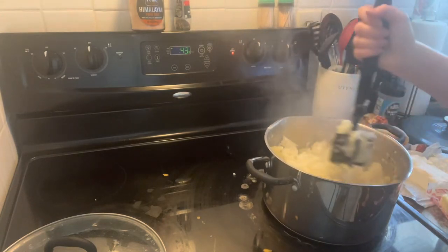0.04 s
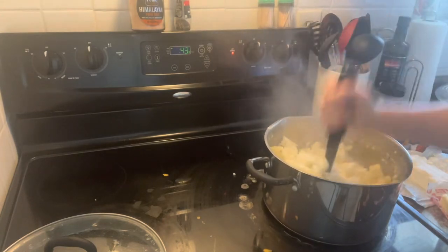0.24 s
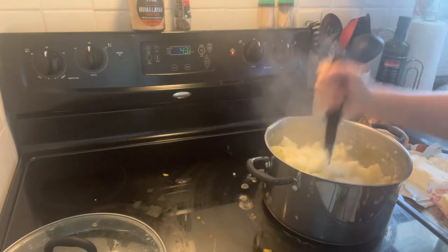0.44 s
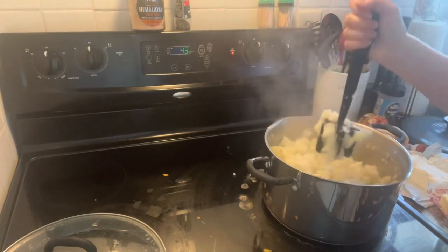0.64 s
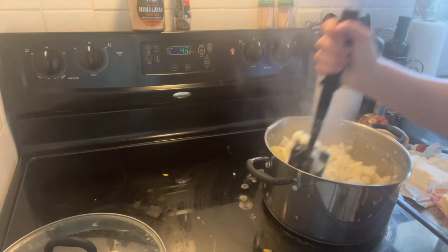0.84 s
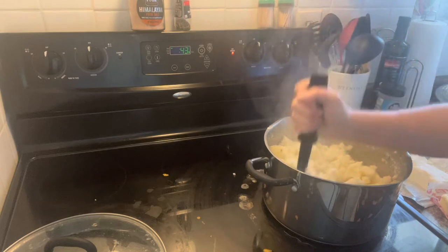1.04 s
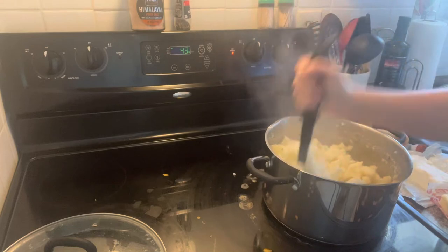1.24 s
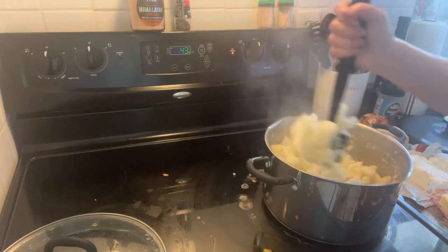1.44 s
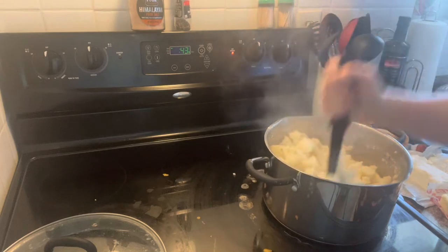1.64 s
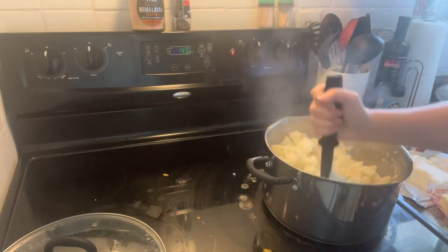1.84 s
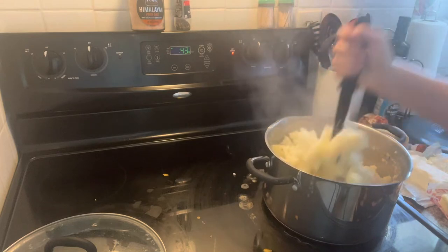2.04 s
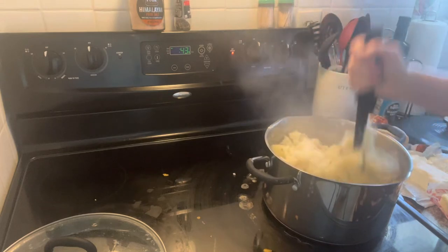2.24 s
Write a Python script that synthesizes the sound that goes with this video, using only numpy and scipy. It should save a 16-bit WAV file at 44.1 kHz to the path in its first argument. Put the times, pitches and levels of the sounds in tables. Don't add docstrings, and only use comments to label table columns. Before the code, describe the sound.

Potato masher thuds against a steel pot, first blow hardest, with wet squishes and soft thumps

```python
import sys
import numpy as np
from scipy import signal
from scipy.fft import rfft, irfft
from scipy.io import wavfile
from scipy.ndimage import uniform_filter1d

SR = 44100
rng = np.random.default_rng(int(sys.argv[2]) if len(sys.argv) > 2 else 0)


def wrap_up_sound(samples):
    columns = np.atleast_2d(samples).T
    tamed = np.clip(columns, -1, 1)
    steps = np.round(tamed * 32767).astype(np.int16)
    wavfile.write(sys.argv[1], SR, steps)


def natural_amplitude(level_db):
    exponent = np.asarray(level_db, float) / 20
    return 10 ** exponent


N = 101429


def evened(x):
    return x / np.sqrt(np.mean(x ** 2) + 1e-20)


def read(points, hz):
    f, value = np.transpose(points)
    return np.interp(np.log(hz + 1), np.log(f + 1), value)


def add(mix, s, sound):
    part = mix[round(s * SR):][:len(sound)]
    part += sound[:len(part)]


def coloured(x, points):
    gain = natural_amplitude(read(points, np.fft.rfftfreq(len(x), 1 / SR)))
    return evened(irfft(rfft(x) * gain, len(x)))


def band(x, hz, width_hz):
    turn = np.exp(2j * np.pi * hz * np.arange(len(x)) / SR)
    r = np.exp(-np.pi * width_hz / SR)
    return evened((turn * signal.lfilter([1], [1, -2 * r, r * r], x / turn)).real)


def ring(hz, db, t60, t):
    return natural_amplitude(db - 60 * t / t60) * np.sin(2 * np.pi * hz * t)


# f/Hz, density/dB per Hz
AIR = [(25, -8.5), (60, 3.5), (120, -11.5), (300, 0.5), (600, -1.5), (1200, -12.5), (2000, -17.5),
       (3500, -22), (16000, -34)]


def room_air():
    hz, _, z = signal.stft(rng.standard_normal(N), SR, nperseg=1024, noverlap=768)
    patches_db = uniform_filter1d(rng.standard_normal(z.shape), size=10, axis=0)
    patches_db = evened(uniform_filter1d(patches_db, size=12, axis=1))
    z = z * natural_amplitude(read(AIR, hz)[:, None] + patches_db)
    return natural_amplitude(-59) * evened(signal.istft(z, SR, nperseg=1024, noverlap=768)[1][:N])


# f/Hz, level/dB rms, blurred share/0-1, blur width/Hz
FAN = [(57.5, -72, 1, 15), (119.6, -73, 0.4, 30), (181, -71, 0, 4.9), (280, -69.5, 0.55, 60),
       (353.2, -73, 0.9, 44), (412.8, -64.5, 0, 30), (513.5, -75, 0.22, 25), (847, -80, 0.4, 14),
       (1815, -74.5, 0, 25), (1858, -76.5, 0.97, 370), (3346, -81, 0.18, 106), (4280, -86.5, 0.6, 30),
       (4830, -87, 0.1, 17), (7370, -81.5, 0.83, 53)]


def fan():
    t = np.arange(N) / SR
    sway_hz, sway_db, sway_phase_rad = 11.5, -46, -.1
    out = natural_amplitude(sway_db) * np.cos(2 * np.pi * sway_hz * t + sway_phase_rad)
    for hz, db, blur, width_hz in FAN:
        steady = np.sqrt(2 - 2 * blur) * np.sin(2 * np.pi * hz * t)
        wavering = np.sqrt(blur) * band(rng.standard_normal(N + SR), hz, width_hz)[SR:]
        out += natural_amplitude(db) * (steady + wavering)
    return out


# t/s, squelch level/dB, fizz level/dB
PRESS = [(0, -72, -76), (.1, -86, -77.5), (.18, -68.5, -68), (.24, -58.5, -78), (.45, -67, -73.5),
         (0.521, -92, -78), (0.632, -68.5, -77), (.87, -82, -78), (.925, -64.5, -69), (1.03, -64.5, -81),
         (1.1, -66.5, -83), (1.25, -66.5, -75), (1.3, -102, -81), (1.6, -85, -72.5), (1.655, -62, -71),
         (1.8, -62, -88), (1.95, -66.5, -74.5), (2.1, -74, -79)]
# f/Hz, density/dB per Hz
MASH = [(300, -15), (1000, 12), (2500, 5), (4000, 3), (6000, -13), (10000, -10), (16000, -36)]
# f/Hz, density/dB per Hz
FIZZ = [(3000, -20), (6000, 5.5), (10000, 2), (13500, 2), (16000, -1)]


def mash():
    grains_per_s, spread_db, grain_db = 1500, 3.5, -2
    size = natural_amplitude(spread_db * np.minimum(rng.exponential(1, N), 5))
    clicks = size * (rng.random(N) < grains_per_s / SR) * rng.choice([-1, 1], N)
    grain = rng.standard_normal(N) + natural_amplitude(grain_db) * evened(clicks)
    t = np.arange(N) / SR
    s, squelch_db, fizz_db = np.transpose(PRESS)
    squelch = coloured(grain, MASH) * natural_amplitude(np.interp(t, s, squelch_db))
    fizz = coloured(grain, FIZZ) * natural_amplitude(np.interp(t, s, fizz_db))
    return squelch + fizz


# start t/s, length/s, level/dB, f/Hz, width/Hz
WHISTLES = [(0.138, 0.061, -75, 3800, 300), (0.283, 0.075, -78, 9940, 200), (.42, 0.07, -76.5, 3860, 400),
            (1.087, 0.048, -77, 9900, 200), (1.17, .02, -75, 3820, 300), (1.21, 0.079, -72, 3800, 400),
            (1.65, .04, -86, 12800, 600), (1.757, .008, -66, 3780, 500), (1.772, 0.0073, -69, 4000, 500),
            (1.876, 0.13, -73.5, 3920, 250)]


def whistles():
    out = np.zeros(N)
    for s, length_s, db, hz, width_hz in WHISTLES:
        n = int(length_s * SR)
        swell = np.sin(np.pi * np.arange(n) / n)
        puff = band(rng.standard_normal(SR // 5), hz, 1.15 * width_hz)[-n:]
        add(out, s, natural_amplitude(db + 4) * swell * puff)
    return out


# t/s, level/dB, f/Hz
TICKS = [(.923, -51, 10500), (1.115, -52, 9500), (1.55, -50.5, 9050), (1.632, -49, 12000),
         (1.728, -64, 12500)]


def ticks():
    out, t = np.zeros(N), np.arange(200) / SR
    for s, db, hz in TICKS:
        add(out, s, ring(hz, db, 0.0014, t))
    return out


# t/s, level/dB, f/Hz, t60/s
THUMPS = [(.225, -49, 422, 0.11), (.31, -28, 527, 0.03), (.328, -35, 477, 0.025), (.44, -41, 211, 0.034),
          (.78, -52, 170, 0.076), (1.045, -44.5, 134.6, 0.19), (1.051, -40, 58.7, 0.17),
          (1.115, -56, 554, 0.052), (1.158, -46.5, 70, .1), (1.75, -32, 280, 0.038),
          (1.049, -57, 2600, 0.042), (1.751, -51.5, 2675, 0.032), (1.128, -51, 169, .05),
          (1.151, -54, 120, 0.087), (1.145, -49.5, 410, 0.091), (1.24, -39, 185, 0.03),
          (1.335, -62, 403, 0.031), (1.679, -47.5, 2050, .03), (1.775, -34.5, 584, 0.031),
          (1.815, -63, 570, .06), (1.84, -39, 179, 0.038), (1.885, -53, 121, 0.087),
          (1.87, -39.5, 323, 0.034), (1.925, -53, 518, 0.13)]


def thumps():
    out, t = np.zeros(N), np.arange(SR // 5) / SR
    for s, db, hz, t60 in THUMPS:
        soft_start = np.minimum(t * hz / 0.5, 1)
        add(out, s, soft_start * (ring(hz, db, t60, t) + ring(1.45 * hz, db - 13, t60, t)))
    return out


# f/Hz, level/dB, t60/s
POT = [(141, -23, 0.14), (294.5, -13, 0.12), (435, -11.5, 0.021), (542.6, 5, 0.045), (675, -9, 0.039),
       (691, -3, 0.046), (820, -6.5, 0.07), (1144, 1, 0.026), (1415, -15.5, 0.11), (1638, 0.5, 0.053),
       (2024, -11, 0.044), (2260, -10.5, 0.044), (2900, -18, 0.049), (4430, -14, 0.12)]
# f/Hz, level/dB, t60/s
HOB = [(62.7, -28.5, 0.93), (66, -28, 0.7)]
# f/Hz, density/dB per Hz
CRACK = [(100, -29.5), (380, -5.5), (750, -1), (980, -9), (1250, 1.5), (2000, -0.5), (3000, -7),
         (4500, -40), (15000, -56)]
# f/Hz, density/dB per Hz
CRACKLE = [(1000, -16), (2700, -2), (4600, -13), (6500, -14), (10000, -38), (14000, -43)]


def knock(contact_ms, level_db, first_touch_db, crackle_db):
    t = np.arange(SR) / SR
    touch_s, bounce_s, bounce_db = 0.002, .0047, -15

    def push(at_s):
        since = np.maximum(t - at_s, 0)
        return since / contact_ms * np.exp(-since * 4000 / contact_ms)

    force = natural_amplitude(first_touch_db) * push(0) + push(touch_s) + natural_amplitude(bounce_db) * push(touch_s + bounce_s)
    body = sum(ring(hz, db, t60, t) * (-1) ** k for k, (hz, db, t60) in enumerate(POT))
    body += sum(ring(hz, db, t60, t) for hz, db, t60 in HOB)
    crack_db, crack_t60 = 0, 0.13
    body += coloured(rng.standard_normal(SR), CRACK) * natural_amplitude(crack_db - 60 * t / crack_t60)
    blow = natural_amplitude(level_db) * signal.fftconvolve(force / push(0).sum(), body)[:SR]

    after_s, crackle_t60, rise_s = t - touch_s, 0.047, 0.00043
    crackle = coloured(rng.standard_normal(SR), CRACKLE) * natural_amplitude(crackle_db - 60 * after_s / crackle_t60)
    return touch_s, blow + crackle * np.clip(after_s / rise_s, 0, 1)


# blow t/s, level/dB, contact/ms, first touch/dB, crackle/dB
KNOCKS = [
    (0.2453, -16.5, 0.51, -31, -33),
    (1.0473, -30.5, 0.83, -11, -63),
    (1.749, -28, 0.78, -41, -56),
]


def knocks():
    close, thrown = np.zeros(N), np.zeros(N)
    thrown_t60 = .035
    fade = natural_amplitude(-60 * np.arange(SR) / SR / thrown_t60)
    for s, level_db, contact_ms, first_touch_db, crackle_db in KNOCKS:
        touch_s, sound = knock(contact_ms, level_db, first_touch_db, crackle_db)
        add(close, s - touch_s, sound)
        add(thrown, s - touch_s, sound * fade)
    return close, thrown


# f/Hz, t60/s
ROOM = [(100, 0.41), (500, 0.52), (2000, 0.39), (5000, 0.2), (12000, 0.48)]


def room(x):
    t = np.arange(SR) / SR
    taps = rng.standard_normal(SR) * np.clip(t / .006 - .5, 0, 1)
    hz, t, z = signal.stft(taps, SR, nperseg=256)
    tail = signal.istft(z * natural_amplitude(-60 * t / read(ROOM, hz)[:, None]), SR, nperseg=256)[1]
    return signal.fftconvolve(x, tail / np.linalg.norm(tail))[:N]


def scene():
    background = room_air() + fan()
    wet = mash() + whistles() + ticks()
    thump = thumps()
    knocked, thrown = knocks()
    thump_echo_db, room_db, low_hz = -10.5, -1.5, 35.6
    echo = natural_amplitude(room_db) * room(thrown + natural_amplitude(thump_echo_db) * thump)
    high_pass = signal.butter(2, low_hz, "high", fs=SR, output="sos")
    pot = signal.sosfilt(high_pass, thump + knocked + echo)
    return (pot + wet + background)[None]


def top_cut(x):
    return signal.sosfilt(signal.butter(12, 16290, fs=SR, output="sos"), x)


def record(dry):
    skip_s, skip_db, skip_ms, edge_hz = .2712, -25, .25, 15800
    t = np.arange(N) / SR - skip_s
    jump = natural_amplitude(skip_db) * np.sign(t) * np.exp(-abs(t) * 1000 / skip_ms)
    low_pass = signal.firwin(511, edge_hz, window=("kaiser", 9), fs=SR)
    mix = signal.oaconvolve(dry + jump, low_pass[None], "same")
    return top_cut(mix)


dry = scene()
out = record(dry)
wrap_up_sound(out)
```